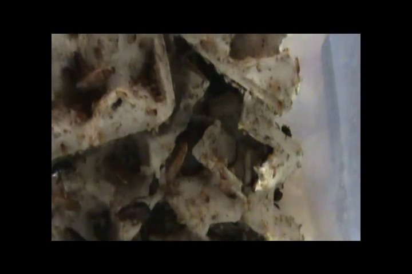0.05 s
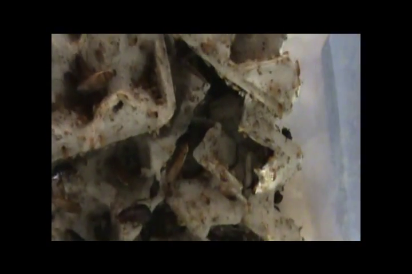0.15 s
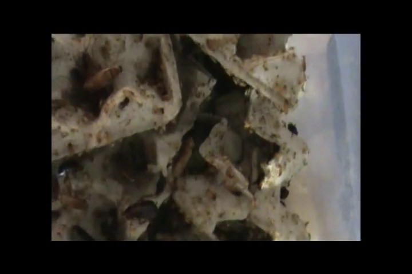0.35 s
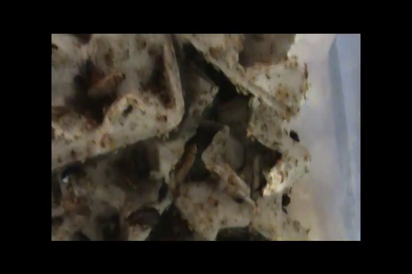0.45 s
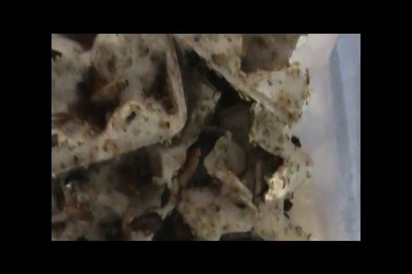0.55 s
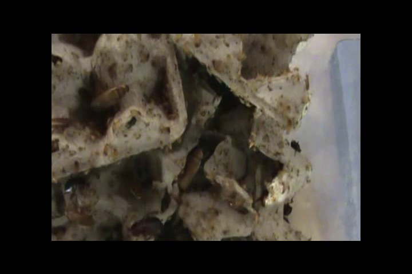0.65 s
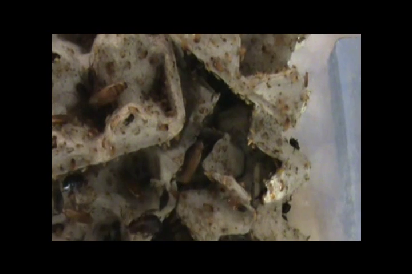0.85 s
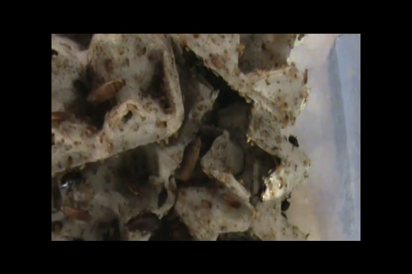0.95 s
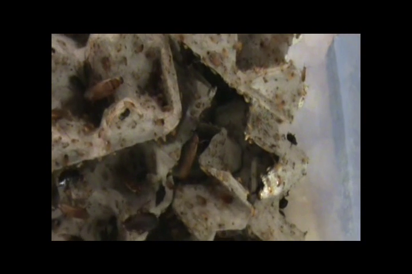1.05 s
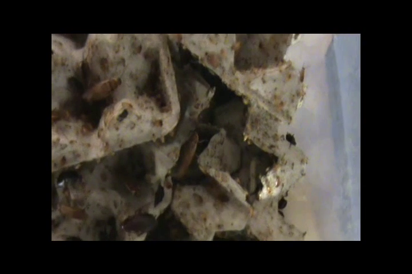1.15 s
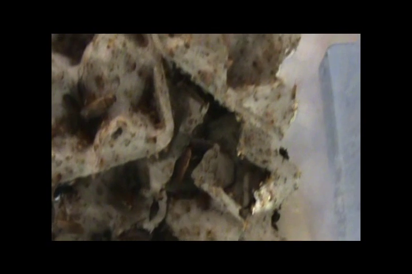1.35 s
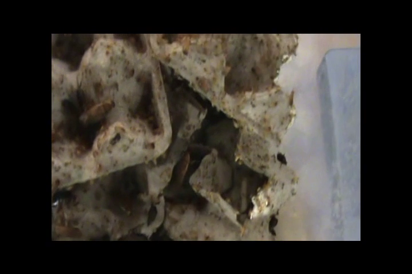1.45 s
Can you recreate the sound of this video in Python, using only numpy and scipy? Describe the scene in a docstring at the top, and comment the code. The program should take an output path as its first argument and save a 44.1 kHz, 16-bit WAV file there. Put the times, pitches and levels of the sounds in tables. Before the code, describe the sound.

Cockroaches tick and patter on cardboard trays, close by, with faint hiss and hum.

```python
"""Cockroaches in a plastic tub

Cockroaches move about on cardboard egg trays, close by. A few sharp ticks crack, ring briefly
in the card and die away in the tub; the last one also flexes the tray with a dull thud.
Tiny legs patter on the card between them. Under it lie a low mains hum, soft hiss and a faint whine."""
import sys
import numpy as np
from scipy import signal
from scipy.fft import rfft, irfft
from scipy.io import wavfile

SR = 44100
rng = np.random.default_rng(int(sys.argv[2]) if len(sys.argv) > 2 else 0)


def persist_wave(psi):
    """Save psi, clipped to +-1, as 16-bit WAV."""
    counts = np.round(np.clip(psi, -1, 1) * 32767).astype(np.int16)
    wavfile.write(sys.argv[1], SR, np.atleast_2d(counts).T)


N = 66150
TIME = np.arange(N) / SR
AGE = np.arange(SR // 8) / SR   # seconds since one short sound began
TOP_HZ = 16000
OPPOSITE = np.array([[1], [-1]])   # plus on the left, minus on the right


def from_db(db):
    """Turn decibels into a number to multiply by."""
    return 10 ** (np.asarray(db) / 20)


def at_hz(points, hz):
    """Read between the rows of a table, giving every octave equal room."""
    frequencies, values = np.transpose(points)
    return np.interp(np.log(hz), np.log(frequencies), values)


def filtered(sound, hz, kind, order=2):
    """Keep the lows, the highs or one band of a sound."""
    return signal.sosfilt(signal.butter(order, np.clip(hz, 10, .45 * SR), kind, fs=SR, output="sos"), sound)


def fade(fade_s):
    """Die away from full level; a fade time is the time taken to fall by 60 dB."""
    return np.exp(-np.log(1000) * AGE / fade_s)


def add(out, start_s, sound):
    """Mix a sound in at a given time."""
    i = int(start_s * SR)
    out[:, i:i + sound.shape[-1]] += sound[..., :max(N - i, 0)]


def burst(low_hz, high_hz, fade_s, likeness):
    """A dying puff of noise in one band; a likeness of 1 makes left and right the same."""
    shared, side = rng.standard_normal((2, len(AGE)))
    noise = np.sqrt(1 + likeness) * shared + np.sqrt(1 - likeness) * side * OPPOSITE
    puff = filtered(noise * fade(fade_s), [low_hz, high_hz], "band")
    click_energy = 2 * (high_hz - low_hz) / SR   # what a one-sample click holds in this band
    return puff * np.sqrt(click_energy / np.mean(np.sum(puff ** 2, axis=1)))


def wide_burst(fade_at, likeness_at):
    """Puffs from low to high, each band with its own fade time and left-right likeness."""
    edges = np.geomspace(200, TOP_HZ, 12)
    centres = np.sqrt(edges[:-1] * edges[1:])
    return sum(burst(lo, hi, fade_at(hz), likeness_at(hz)) for lo, hi, hz in zip(edges, edges[1:], centres))


# Hiss shared by both sides, and hiss that sets them apart: (frequency [Hz], level [dB])
SHARED_HISS = [(25, -44.5), (60, -49), (130, -48.5), (260, -52.5), (420, -51), (900, -56.5), (1500, -58),
               (2600, -56), (5200, -64), (7800, -61.5), (10000, -68), (15500, -71)]
SIDE_HISS = [(25, -70), (130, -64.5), (250, -58.5), (600, -55.5), (1300, -56.5), (2800, -60), (5000, -65),
             (8000, -68.5), (12500, -76.5), (15500, -80)]

def hiss():
    """Soft, steady noise, stronger in the lows."""
    hz = np.maximum(np.fft.rfftfreq(N, 1 / SR), 1)
    shared, side = (irfft(rfft(rng.standard_normal(N)) * from_db(at_hz(table, hz)), N)
                    for table in (SHARED_HISS, SIDE_HISS))
    return shared + side * OPPOSITE


# Tones of the mains hum: (frequency [Hz], level [dB])
HUM_TONES = [(100, -59.5), (150, -70.5), (200, -80)]

def hum():
    """Mains electricity hums in a few low, steady tones."""
    return sum(np.sqrt(2) * from_db(db) * np.sin(2 * np.pi * (hz * TIME + rng.random()))
               for hz, db in HUM_TONES)


# Bands of the whine: (centre [Hz], width [Hz], level [dB])
WHINE_BANDS = [(6365, 50, -78), (7900, 350, -79.5)]

def whine():
    """Noise in bands so narrow that it sounds like a faint, high note."""
    out = np.zeros(N)
    for hz, width, db in WHINE_BANDS:
        band = filtered(rng.standard_normal(N), [hz - width / 2, hz + width / 2], "band", order=1)
        out += from_db(db) * band / band.std()
    return out


# Swells of high hiss: (time of peak [s], length [s], level [dB])
HISS_SWELLS = [(0.843, 0.12, -73), (1.085, 0.12, -71)]

def swells(band_hz=(7620, 8150)):
    """A thin band of hiss comes and goes twice."""
    band = filtered(rng.standard_normal(N), band_hz, "band")
    loudness = sum(from_db(db) * np.cos(np.pi * np.clip((TIME - peak_s) / length, -.5, .5)) ** 2
                   for peak_s, length, db in HISS_SWELLS)
    return band / band.std() * loudness


# The clearer footsteps: (time [s], level [dB], low edge [Hz], high edge [Hz], fade time [s])
CLEAR_STEPS = [(0.148, -13, 530, 1550, 0.22), (0.253, -21.5, 1400, 2700, 0.033),
               (0.291, -27, 2500, 3500, .015), (0.322, -21, 1840, 2800, 0.024),
               (0.611, -25.5, 1980, 4470, 0.013), (0.672, -31, 4000, 8700, 0.017),
               (0.701, -20, 2240, 2770, 0.019), (0.831, -29, 2000, 8540, 0.027),
               (0.911, -29, 4300, 7400, 0.02), (1.005, -21, 950, 1700, .015),
               (1.026, -23, 1320, 2310, 0.044), (1.038, -20, 3020, 3630, 0.058),
               (1.082, -22.5, 1700, 4020, 0.025), (1.153, -20.5, 3100, 4700, 0.02),
               (1.184, -20, 900, 2470, 0.03), (1.274, -23, 3240, 4940, 0.01),
               (1.289, -26, 3300, 4600, 0.016), (1.385, -25, 4550, 8500, 0.019),
               (1.391, -19, 550, 2280, 0.056)]

def footfalls(patter_per_s=65, lowest_hz=1790, highest_hz=4260, spread=1.34):
    """Legs scratch on card: clear steps, a quieter random patter and one soft, low bump."""
    bump = (0.285, -2, 220, 278, 0.15)   # same columns as the steps
    patter = []
    for when, size, pitch in rng.random((int(patter_per_s * N / SR), 3)):
        hz = lowest_hz * (highest_hz / lowest_hz) ** pitch
        patter.append((when * N / SR, -34 + 6 * size ** 2, hz / spread, hz * spread, 0.01))
    out = np.zeros((2, N))
    for start_s, db, low_hz, high_hz, fade_s in CLEAR_STEPS + [bump] + patter:
        add(out, start_s, from_db(db) * burst(low_hz, high_hz, fade_s, likeness=0.99))
    return out


# Low tones of the flexing tray: (frequency [Hz], level [dB], fade time [s])
THUD_TONES = [(450, -37, 0.012), (697, -23.5, .009), (1101, -46.5, 0.15)]

def thud(start_s=0.5197):
    """The last tick also flexes the tray: a dull thud with a faint, hollow ring."""
    out = np.zeros((2, N))
    tones = sum(from_db(db) * fade(fade_s) * np.sin(2 * np.pi * hz * AGE) for hz, db, fade_s in THUD_TONES)
    add(out, start_s, filtered(tones, 170, "high", order=1))   # a small tray gives off little bass
    return out


# Tones at which the tray rings: (frequency [Hz], level [dB], fade time [s])
TRAY_TONES = [(846, -38, 0.06), (1130, -42, 0.024), (1354, -34, 0.044), (1570, -44, 0.033),
              (1922, -36.5, 0.048), (2152, -37.5, 0.024), (2365, -30, 0.021), (2697, -33.5, 0.031),
              (3880, -35.5, 0.022), (4210, -34.5, 0.02), (5157, -34.5, 0.021), (7230, -45, 0.016),
              (7830, -29, 0.01), (9900, -55, .012)]

def tray_ring(uneven_db=2.5, skew_radians=0.71):
    """Each blow rings the tray a little differently; its tones reach the two sides out of step."""
    out = 0
    for hz, db, fade_s in TRAY_TONES:
        phase = rng.choice([0, np.pi]) + skew_radians * rng.standard_normal() * OPPOSITE
        strength = from_db(db + uneven_db * rng.standard_normal((2, 1)))
        out += strength * fade(fade_s) * np.sin(2 * np.pi * hz * AGE + phase)
    return out


# How long sound bounces among the trays: (frequency [Hz], fade time [s])
ECHO_FADES = [(300, 0.041), (1200, 0.072), (2500, 0.057), (5000, 0.026), (12000, 0.024)]

def echoes(likeness=0.14, tub_fade_s=0.19):
    """Sound scatters among the trays and leaves a softer, duller tail in the tub."""
    scatter = wide_burst(lambda hz: at_hz(ECHO_FADES, hz), lambda hz: likeness)
    tail = wide_burst(lambda hz: tub_fade_s, lambda hz: likeness)
    return scatter + from_db(-12) * filtered(tail, 3000, "low", order=1)


# How alike a crack is on the left and right: (frequency [Hz], likeness [-1 to 1])
CRACK_STEREO = [(500, 0.83), (1200, 0.31), (2200, -0.14), (4000, -0.039), (8000, 0.29), (14000, .3)]

def crack():
    """The snap that starts a tick; its highs die fastest."""
    return wide_burst(lambda hz: 0.0046 * (2000 / hz) ** 0.42, lambda hz: at_hz(CRACK_STEREO, hz))


# Sharp ticks on the card: (time [s], level [dB], low edge [Hz], high edge [Hz], flap tone [Hz],
# flap boost [dB], echo level [dB], ring level [dB], left over right [dB])
CARD_TICKS = [(0.2160, 5, 1164, 4640, 1410, 5.5, -15, -7.5, 1.5),
              (0.3537, -17.5, 950, 14100, 7500, 9.5, -2, 0, -1),
              (0.4492, 4, 870, 4730, 1484, 6.5, -8, 1, 1), (0.4560, -8.5, 810, 3500, 9700, 11, -2.5, 4, 7),
              (0.5194, 2.5, 383, 1810, 2100, 6.5, -3.5, 0.5, 4.5)]

def ticks(flap_sharpness=4.1, right_brighter=1.56):
    """A crack, its echoes and the tray's ring, coloured by the contact and the flap of card that is hit."""
    out = np.zeros((2, N))
    for start_s, db, low_hz, high_hz, flap_hz, flap_db, echo_db, ring_db, left_db in CARD_TICKS:
        tick = crack() + from_db(echo_db) * echoes() + from_db(ring_db) * tray_ring()
        flap = signal.lfilter(*signal.iirpeak(flap_hz, flap_sharpness, fs=SR), tick)
        tick += (from_db(flap_db) - 1) * flap
        # The high edge moves down on the left and up on the right.
        left = filtered(tick[0], high_hz / right_brighter, "low", order=1)
        right = filtered(tick[1], high_hz * right_brighter, "low", order=1)
        tick = filtered([left, right], low_hz, "high", order=3)
        tick = filtered(tick, 8870, "low")
        add(out, start_s, tick * from_db(db + left_db / 2 * OPPOSITE))
    return out


def scene():
    """The quiet background plus the cockroaches on their trays."""
    return hiss() + hum() + whine() + swells() + footfalls() + thud() + ticks()


def record(dry):
    """Cut away the very highest treble."""
    return signal.sosfilt(signal.ellip(10, .1, 70, TOP_HZ, fs=SR, output="sos"), dry)


dry = scene()
out = record(dry)
persist_wave(out)
```